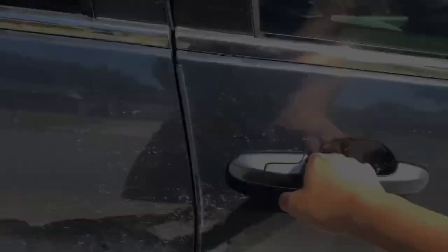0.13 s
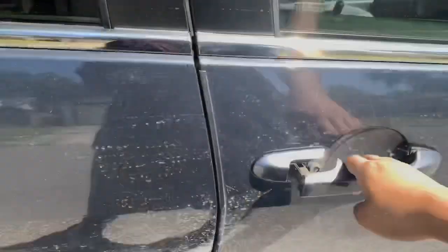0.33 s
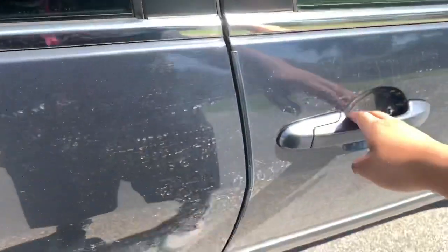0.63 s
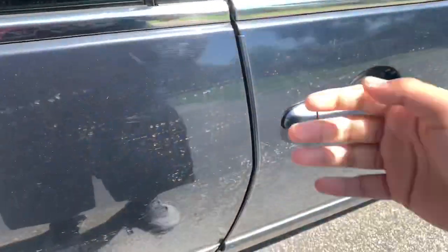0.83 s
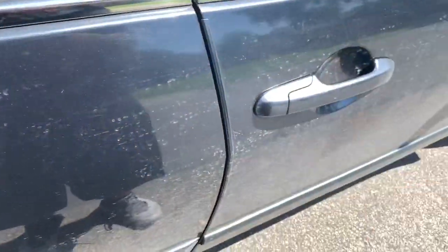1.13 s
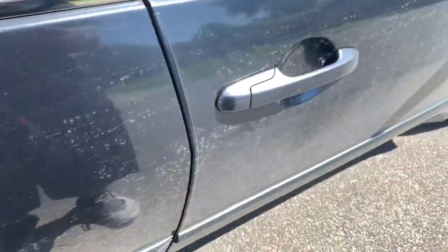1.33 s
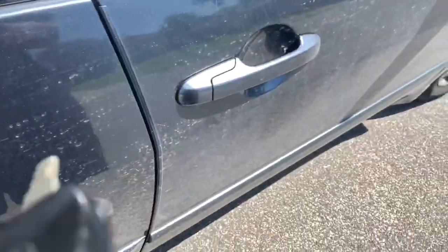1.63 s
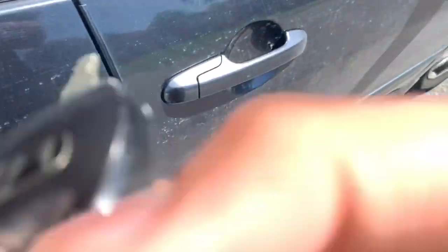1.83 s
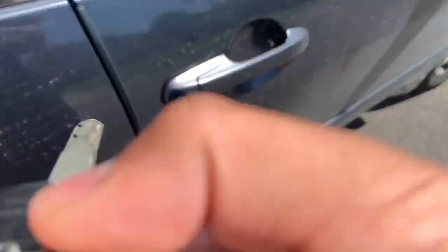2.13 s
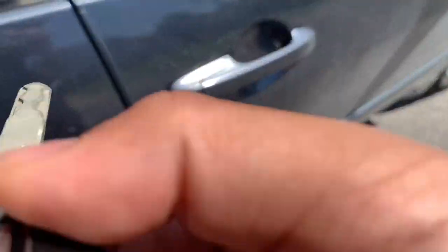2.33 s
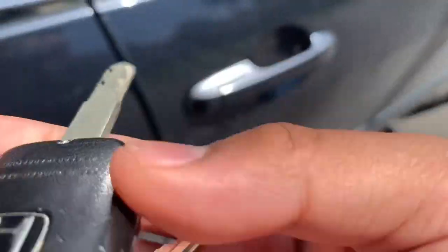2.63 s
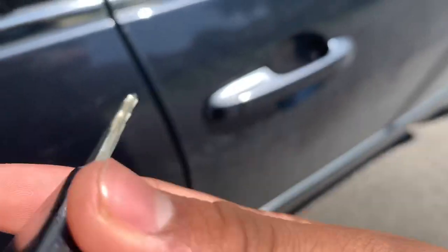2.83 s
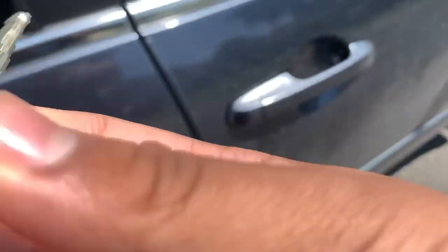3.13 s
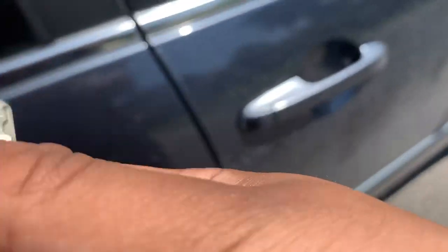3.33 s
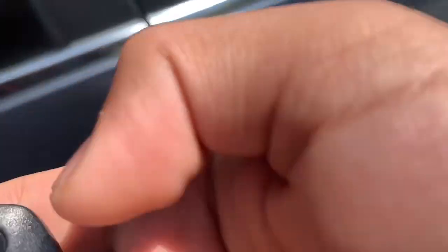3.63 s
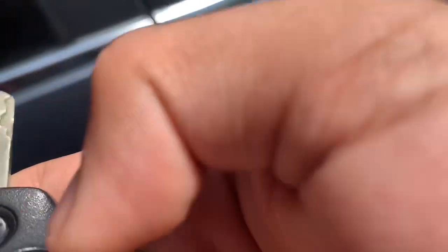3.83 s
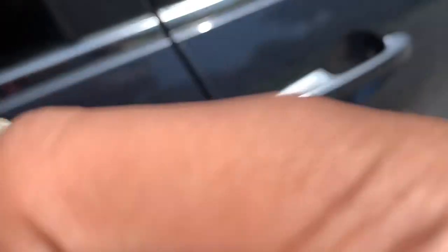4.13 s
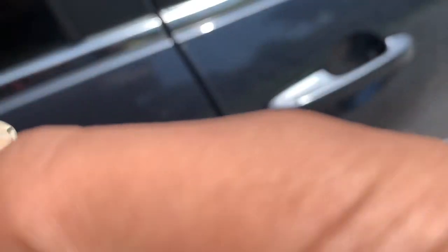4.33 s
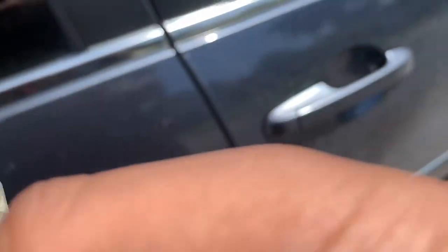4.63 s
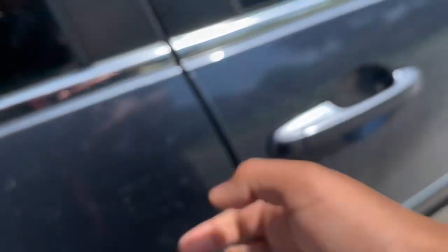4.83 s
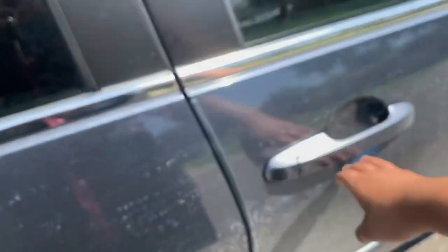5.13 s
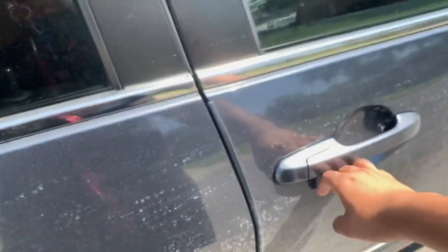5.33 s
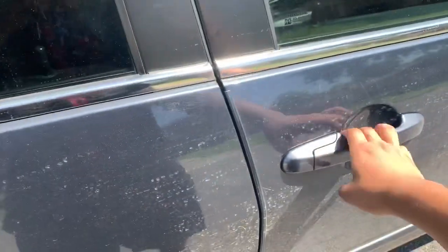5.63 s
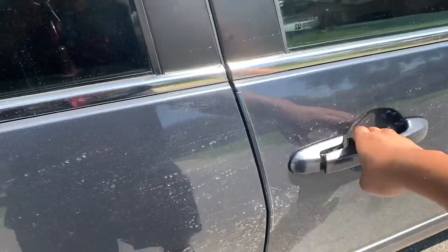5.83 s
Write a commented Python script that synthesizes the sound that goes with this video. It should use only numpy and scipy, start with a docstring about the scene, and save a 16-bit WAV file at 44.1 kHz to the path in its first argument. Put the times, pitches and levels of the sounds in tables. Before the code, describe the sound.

Close, handheld stereo outdoors beside a car. A door handle is pulled and let go with sharp clacks and hollow panel thumps in the first second. A key fob is then turned in the hand, with plastic ticks, brief metal ringing and skin rustle, in uneven clusters. Finally the hand returns to the handle with softer panel thuds. Faint traffic, insect hiss and low wind rumble lie behind.

```python
"""Outdoors beside a car: a door handle is pulled and let go, thumping the panel; then a key fob is turned
over in a hand, its plastic ticking and its metal key ringing, and the hand returns to the handle.
Contacts are noise bursts through resonances; panel and key are sums of dying partials; skin is shaped noise.
Behind: far traffic, insects hissing near 10 kHz and wind, as shaped noise; stereo from two spaced ports."""
import sys
import numpy as np
from scipy import signal
from scipy.fft import rfft, irfft, next_fast_len
from scipy.io import wavfile
from scipy.ndimage import uniform_filter1d

SR = 44100
rng = np.random.default_rng(int(sys.argv[2]) if len(sys.argv) > 2 else 0)


def to_wav(s):
    """Save 16-bit WAV."""
    ch = np.atleast_2d(s).T  # columns
    pcm = np.round(np.clip(ch, -1, 1) * 32767)  # PCM
    wavfile.write(sys.argv[1], SR, pcm.astype(np.int16))


N = 264497

# resonances of the fob's hollow shell: f/Hz, width/Hz, level/dB
SHELL_HOLLOW = [(164.7, 60, 13), (335, 160, 3), (435.5, 282, 10.5), (743, 83, 3), (890, 315, 0.5)]
LEFT_LAG_SAMPLES = 11.4


def gain_of(db):
    """Decibels to gain."""
    return 10 ** (np.asarray(db) / 20)


def read(points, hz):
    """Value of a spectrum table on a log-frequency axis."""
    f, value = np.transpose(points)
    return np.interp(np.log(hz + 1), np.log(f + 1), value)


def peaked(x):
    """Scales to peak 1."""
    return x / (abs(x).max() + 1e-12)


def add(mix, start_s, sound):
    """Mixes a sound in at start_s, cut at the end of the mix."""
    part = mix[round(start_s * SR):][:len(sound)]
    part += sound[:len(part)]


def coloured(x, points):
    """Filters by a spectrum table, with zero phase."""
    size = next_fast_len(len(x) + 1024)  # padded against wrap-around
    gain = gain_of(read(points, np.fft.rfftfreq(size, 1 / SR)))
    return irfft(rfft(x, size) * gain, size)[:len(x)]


def resonate(x, hz, width_hz):
    """A fixed resonance of gain 1: shift hz to zero, one-pole low-pass, shift back."""
    turn = np.exp(2j * np.pi * hz * np.arange(len(x)) / SR)
    pole = np.exp(-np.pi * width_hz / SR)
    return 2 * (turn * signal.lfilter([1 - pole], [1, -pole], x / turn)).real


def resonate_twice(x, hz, width_hz):
    """Two equal resonances in series: steeper skirts."""
    return resonate(resonate(x, hz, width_hz), hz, width_hz)


def through_hollow(x):
    """The parallel resonances of the fob's hollow."""
    return sum(gain_of(db) * resonate_twice(x, hz, width_hz) for hz, width_hz, db in SHELL_HOLLOW)


def ringing(modes, db, t):
    """Sum of dying partials with random phases."""
    hz, _, t60_s = np.transpose(modes)[..., None]
    decay = gain_of(db[:, None] - 60 * t / t60_s)
    return (decay * np.sin(2 * np.pi * (hz * t + rng.random(hz.shape)))).sum(0)


def burst(t, rise_s, t60_s):
    """Noise under a rounded rise and an exponential fall."""
    return rng.standard_normal(len(t)) * (1 - np.exp(-(t / rise_s) ** 2)) * gain_of(-60 * t / t60_s)


def curve(rows, index):
    """One dB column of a curve table at every sample, as gain."""
    rows = np.array(rows)
    return gain_of(np.interp(np.arange(N) / SR, rows[:, 0], rows[:, index]))


def noise(points, patchy_db):
    """Two unrelated noises of the given spectrum under shared drifting patches, as short-time spectra."""
    frames, hz = N // 128 + 5, np.fft.rfftfreq(512, 1 / SR)
    a, b, c, d, patches = rng.standard_normal((frames, 257, 5)).T
    patches = uniform_filter1d(uniform_filter1d(patches, size=6, axis=0), size=24, axis=1)
    level = gain_of(read(points, hz)[:, None] + patchy_db * patches / patches.std())
    return hz[:, None], np.array([a + 1j * b, c + 1j * d]) * level


def to_sound(z):
    """Inverse short-time transform, scaled so that levels are per root Hz."""
    return signal.istft(z, nperseg=512, noverlap=384)[1][..., :N] * np.sqrt(SR / 512) * 2


def air():
    """Far traffic: patchy noise, most alike at the ports in the bass and near 8 kHz."""
    # spectrum: f/Hz, level/dB per root Hz
    air_spectrum = [(20, -109), (60, -78), (150, -83.5), (400, -95), (1000, -100), (2000, -119),
                    (3200, -124), (4700, -112), (6000, -120), (8000, -118), (11000, -135), (17000, -145)]
    # likeness of the ports: f/Hz, share of common noise (0 to 1)
    likeness = [(60, 0.88), (300, 1), (700, 0.17), (2000, 0.11), (5000, 0.19), (8000, 0.93)]
    hz, (a, b) = noise(air_spectrum, patchy_db=0.5)
    same = np.clip(read(likeness, hz), 0, 1)
    late = np.exp(-2j * np.pi * hz * LEFT_LAG_SAMPLES / SR)
    left = late * (same * a + np.sqrt(1 - same ** 2) * b)
    return to_sound(np.array([left, a]))


def wind():
    """Rumble of wind and of the moving hand: lumpy low noise, mostly shared by the ports."""
    # t/s, level/dB
    rumble_level = [(0.0, -43.5), (.28, -48), (.38, -38), (.68, -52), (1.4, -57), (2.04, -70.5),
                    (2.39, -41.5), (2.56, -63.5), (3.2, -69), (3.42, -50), (3.66, -53), (3.89, -75),
                    (4.17, -56.5), (4.4, -74), (4.63, -46.5), (5.3, -67), (5.46, -37), (5.68, -57.5),
                    (6.0, -53)]
    band = signal.butter(3, [29, 95], "band", fs=SR, output="sos")
    low = signal.sosfilt(band, rng.standard_normal((2, N)))
    low = np.array([low[0] + .3 * low[1], low[0] - .3 * low[1]])
    return curve(rumble_level, index=1) * low / low.std()


def insects():
    """A narrow hiss whose level drifts in patches."""
    # f/Hz, level/dB per root Hz
    hiss_spectrum = [(7800, -125), (8600, -103), (9300, -102.5), (10000, -98), (10500, -99), (10900, -128)]
    return to_sound(noise(hiss_spectrum, patchy_db=-4.5)[1][0])


def bumps():
    """The microphones bumped in the hand: slow dying swings, alike at both ports."""
    # t/s, peak/dB, f/Hz, t60/s
    swings = [(2.335, -30, 44.6, 0.25), (0.32, -50, 40, .2)]
    out, t = np.zeros(N), np.arange(12000) / SR
    for s, peak_db, hz, t60_s in swings:
        swing = -np.sin(2 * np.pi * hz * t) * (1 - np.exp(-t / 0.0062)) * gain_of(-60 * t / t60_s)
        add(out, s, gain_of(peak_db) * peaked(swing))
    return out


def strokes():
    """Soft strokes of skin on the fob: dull noise that swells and fades."""
    # centre t/s, rms level before the swell/dB, length/s
    skin_strokes = [(0.204, -62, 0.1), (0.736, -51, 0.067), (1.825, -64, 0.1), (2.18, -52, 0.083),
                    (2.263, -51.5, 0.11), (2.61, -57.5, 0.17), (2.867, -56.5, 0.065), (2.996, -55, 0.087),
                    (3.146, -59.5, 0.16), (3.271, -54, 0.083), (4.093, -61.5, 0.098), (5.001, -65.5, 0.11),
                    (5.228, -56, 0.094), (5.872, -64, 0.085)]
    # f/Hz, level/dB
    stroke_tone = [(200, -11), (450, 8.5), (900, 1.5), (1600, -10), (2600, -17.5), (4000, -34)]
    out = np.zeros(N)
    for s, db, length_s in skin_strokes:
        swish = coloured(rng.standard_normal(12000), stroke_tone)[:round(length_s * SR)]
        add(out, s - length_s / 2, gain_of(db) * swish / swish.std() * np.hanning(len(swish)))
    return out


def rubbing():
    """Skin and plastic: dense tiny slips of uneven size make a grainy hiss, with a low rustle under it."""
    # t/s, hiss level/dB, rustle level/dB
    rub_levels = [(0.0, -68.5, -56), (.25, -64.5, -62), (.6, -70, -55), (.8, -90, -65.5), (1.0, -64, -60),
                  (1.15, -71, -63), (1.35, -65, -63), (1.5, -57.5, -55), (1.7, -66.5, -68),
                  (2.2, -68.5, -54), (2.42, -79.5, -63), (3.3, -70.5, -67), (3.5, -55.5, -59),
                  (3.72, -71.5, -59), (4.14, -71, -62), (4.3, -78.5, -61.5), (4.6, -103.5, -67),
                  (4.76, -61.5, -56.5), (5.05, -55, -50), (5.3, -69.5, -57.5), (6.0, -78.5, -61.5)]
    # f/Hz, level/dB
    rub_tone = [(1000, 6), (2000, 9), (3500, 3.5), (4800, 12.5), (6000, 3), (8000, 3.5), (11000, -6),
                (13000, -16), (15500, -31), (16500, -36)]
    slips_per_s = 1500
    size = gain_of(3.0 * np.minimum(rng.exponential(1, N), 5)) * (rng.random(N) < slips_per_s / SR)
    grain = burst(np.arange(400) / SR, 0.00017, 0.009)
    slips = signal.oaconvolve(size * rng.standard_normal(N), grain)[:N]
    hiss = coloured(slips + rng.standard_normal(N), rub_tone)
    rustle = through_hollow(rng.standard_normal(N))
    return curve(rub_levels, index=1) * hiss / hiss.std() + curve(rub_levels, index=2) * rustle / rustle.std()


def chatter(t, t60_s):
    """Loose parts bouncing at random, dying away; peak 1."""
    # f/Hz, level/dB
    rattle_tone = [(800, -18), (1800, 3), (3400, 0.5), (5000, -2.5), (6200, 11), (8200, -1.5),
                   (11500, -2.5), (14000, 10.5), (15800, -23.5), (17000, -52)]
    bounces_per_s = 800
    bounces = rng.exponential(1, len(t)) ** 2 * (rng.random(len(t)) < bounces_per_s / SR)
    bounces = uniform_filter1d(bounces, size=50)
    return peaked(coloured(burst(t, 0.0069, t60_s) * (peaked(bounces) + 0.043), rattle_tone))


def rattles():
    """Further bursts of chatter, short and long, as loose parts rattle."""
    # t/s, peak/dB, t60/s
    rattle_bursts = [(0.098, -50, .1), (0.332, -28.5, 0.066), (0.497, -30, 0.17), (.536, -37, 0.19),
                     (.946, -33, 0.064), (1.341, -25, 0.036), (1.371, -23, 0.17), (1.409, -27, 0.11),
                     (1.547, -38, 0.13), (1.576, -31, 0.061), (2.713, -49, 0.09), (3.122, -39, 0.085),
                     (3.36, -22.5, 0.36), (3.406, -18, 0.24), (3.458, -24, 0.086), (4.572, -38, 0.18),
                     (4.85, -32, 0.048), (4.902, -12.5, 0.11), (4.927, -23.5, 0.064), (5.027, -23.5, 0.22),
                     (5.092, -24, 0.035)]
    out, t = np.zeros(N), np.arange(8000) / SR
    for s, peak_db, t60_s in rattle_bursts:
        add(out, s, gain_of(peak_db) * chatter(t, t60_s))
    return out


def key():
    """The struck metal key rings on, each blow landing elsewhere, each ring wavering randomly in level."""
    # modes: f/Hz, level/dB, t60/s
    key_modes = [(8120, -8, .07), (8725, -15, .09), (9957, 0, .05), (11160, -16, .04), (11940, -20, .05),
                 (12720, -20, .05), (13480, -18, .08), (14262, -5, .17), (15690, -18, .08)]
    # t/s, level/dB added to the modes
    key_blows = [(1.3419, -30), (1.359, -23), (1.3729, -16), (1.4095, -36), (1.724, -41), (1.9765, -53),
                 (2.7389, -33), (3.361, -38), (3.4067, -19), (3.4265, -17), (3.477, -31), (3.5106, -51),
                 (3.57, -52), (3.666, -43), (4.9012, -23), (5.035, -49), (5.0911, -47)]
    out, t = np.zeros(N), np.arange(16000) / SR
    for s, level_db in key_blows:
        struck_db = np.array(key_modes)[:, 1] + 3. * rng.standard_normal(len(key_modes))
        waver = gain_of(5. * peaked(uniform_filter1d(rng.standard_normal(len(t)), size=500)))
        ring = ringing(key_modes, struck_db, t) * (1 - np.exp(-t / 0.0027))
        add(out, s, gain_of(level_db) * ring * waver)
    return out


def knocks():
    """The fob's shell knocking in the palm: rough bursts through its hollow."""
    # t/s, peak/dB, length/s (a third of the burst's t60)
    palm_knocks = [(1.334, -37.5, 0.03), (1.365, -34, 0.025), (1.426, -42, 0.038), (2.134, -34.5, 0.011),
                   (2.737, -50, 0.024), (2.769, -42.5, 0.068), (3.35, -24.5, 0.037), (3.386, -30, 0.041),
                   (3.445, -40, 0.016), (4.148, -36, 0.021), (4.533, -25.5, 0.055), (4.558, -25.5, 0.12),
                   (4.609, -23.5, 0.036), (4.924, -33.5, 0.045)]
    out, t = np.zeros(N), np.arange(8000) / SR
    for s, peak_db, length_s in palm_knocks:
        push = burst(t, 0.0014, 3 * length_s)
        add(out, s, gain_of(peak_db) * peaked(through_hollow(push)))
    return out


def ticks():
    """Hard contacts of handle and fob: a bright crack, a short shell ring, a low tap, loose parts chattering."""
    # t/s, treble peak/dB, treble f/Hz, shell f/Hz, shell peak/dB, body peak/dB, crack t60/s
    contacts = [(0.0964, -27, 7940, 4900, -58, -67, 0.01), (0.118, -28.5, 14400, 1700, -63, -67, 0.017),
                (.1412, -39, 10600, 5260, -59, -66, 0.03), (.3321, -34.5, 8040, 2850, -35, -47, .025),
                (.3434, -50, 8200, 1730, -35, -21.5, 0.021), (0.364, -25, 11300, 1890, -25, -35, 0.03),
                (.373, -9.5, 10500, 2400, -12, -7.5, 0.013), (0.3897, -41, 7980, 1750, -47, -19.5, 0.034),
                (.478, -42, 7430, 1700, -64, -39, .022), (0.495, -11, 14900, 5400, -56, -58, 0.021),
                (0.503, -15, 14700, 2530, -56, -34.5, 0.013), (0.5117, -26, 11800, 2190, -55, -37, 0.034),
                (0.5358, -10.5, 14900, 2390, -27.5, -36, 0.025),
                (0.7002, -43.5, 12400, 3380, -49, -44.5, 0.075),
                (0.7438, -41, 11800, 2200, -39, -41, 0.081), (0.7536, -17.5, 7950, 2570, -23, -19, 0.037),
                (0.7832, -41, 7930, 2230, -40, -27.5, 0.039),
                (0.9458, -30.5, 11700, 2400, -31.5, -33.5, 0.054),
                (0.9588, -46, 11100, 2570, -34.5, -39.5, 0.074), (.9724, -44, 8860, 2430, -34, -46, 0.057),
                (1.337, -25, 11400, 3400, -37, -25, 0.027), (1.3418, -12, 7770, 3410, -11, -26, 0.0049),
                (1.361, -15, 8460, 3380, -23, -33, 0.052), (1.3711, -7.5, 10500, 3430, -23, -26, 0.024),
                (1.3889, -19, 14000, 3420, -25, -27, 0.023), (1.409, -25, 14100, 3470, -33, -46, 0.027),
                (1.4279, -25, 7800, 4600, -30, -28.5, 0.059), (1.493, -27, 7550, 4830, -27.5, -34.5, 0.02),
                (1.5307, -42, 7520, 2610, -51, -37, 0.019), (1.5451, -33, 7150, 3300, -29.5, -32.5, 0.025),
                (1.5741, -40, 7390, 1860, -29, -33.5, 0.047), (1.5884, -35, 8620, 2020, -35, -38, 0.029),
                (1.6133, -40, 7480, 4220, -55, -39, 0.016), (1.6852, -45, 8620, 3330, -40, -40, 0.018),
                (1.7216, -27, 8300, 3840, -47, -32, 0.012), (1.7307, -48, 8040, 1940, -34.5, -37, 0.048),
                (1.749, -41, 8650, 1990, -34.5, -36, 0.034), (1.8573, -44, 10500, 2190, -40.5, -40, 0.017),
                (1.8726, -34.5, 7850, 2160, -38, -35, 0.012), (1.9555, -59, 8200, 3100, -39.5, -43, 0.014),
                (1.9759, -24.5, 8000, 2600, -35, -37.5, 0.018), (2.002, -41, 8100, 2340, -39, -40, 0.038),
                (2.0776, -34, 8060, 3320, -39, -37, 0.012), (2.1215, -39, 8480, 4820, -44, -40, 0.021),
                (2.1374, -20, 7950, 3280, -38, -31.5, 0.011), (2.216, -45, 7330, 4430, -48, -53, .012),
                (2.699, -41, 8310, 2200, -53, -42.5, .025), (2.7149, -42, 14300, 4220, -48, -41, 0.067),
                (2.739, -15.5, 13800, 2860, -55, -32, 0.011), (2.751, -43, 8300, 2120, -59, -32, 0.021),
                (2.776, -53, 8890, 2150, -43.5, -32, 0.027), (2.8171, -27.5, 14300, 2160, -37, -32.5, .017),
                (2.962, -47.5, 8750, 1890, -48, -42, 0.015), (2.9833, -40.5, 8790, 3570, -41.5, -40, 0.023),
                (3.1219, -28.5, 8380, 2200, -40, -36.5, 0.022),
                (3.2393, -36.5, 8600, 3730, -43, -42.5, 0.041), (3.3338, -54, 8740, 1860, -48, -48, 0.042),
                (3.3506, -25.5, 8800, 4650, -30, -43, 0.029),
                (3.361, -20.5, 9500, 4520, -31.5, -27.5, 0.017),
                (3.4056, -1.5, 14500, 3860, -15.5, -26.5, 0.0076),
                (3.4111, -8, 11700, 2060, -20.5, -27, 0.0057), (3.4261, -18, 8450, 3600, -24, -32.5, 0.018),
                (3.458, -24, 14300, 2410, -35, -36, 0.016), (3.4771, -41, 14200, 1970, -33, -45, 0.083),
                (3.5115, -20.5, 10800, 4320, -28, -39, .011), (3.5438, -39, 7620, 2540, -40, -47.5, 0.03),
                (3.57, -35.5, 8510, 2440, -36.5, -50, 0.011),
                (3.5916, -40.5, 8740, 3850, -37.5, -48, 0.056),
                (3.6339, -10, 10400, 3360, -22.5, -41, 0.0096),
                (3.667, -19, 10200, 3320, -25.5, -47, 0.021),
                (3.7386, -16.5, 11000, 4640, -35, -29.5, 0.014),
                (3.785, -63, 10100, 2020, -45.5, -46, 0.03), (4.128, -36.5, 12400, 2430, -43.5, -55, 0.063),
                (4.157, -20, 11000, 2480, -31.5, -29.5, 0.0061),
                (4.1705, -27, 7300, 2500, -27.5, -47, 0.014),
                (4.2199, -20, 11700, 2210, -18.5, -40, 0.0089),
                (4.2953, -32, 11300, 4780, -39.5, -39, .013),
                (4.5473, -34.5, 8150, 1840, -49, -25.5, 0.044), (4.571, -16, 10400, 2430, -15.5, -35, 0.02),
                (4.605, -31, 11100, 1700, -32, -27.5, 0.058),
                (4.6893, -27.5, 7800, 2420, -38, -33.5, 0.0074), (4.752, -39, 8500, 2380, -45, -62, 0.0075),
                (4.7755, -58, 7800, 2500, -47, -50, 0.0058), (4.7884, -56, 8710, 2080, -31, -57, 0.011),
                (4.804, -45, 7180, 2280, -39.5, -65, 0.041), (4.8495, -38, 10800, 3690, -44, -43, 0.044),
                (4.8656, -40, 7300, 2120, -35, -46, .013), (4.874, -47, 7220, 3460, -33, -49, 0.054),
                (4.8914, -29, 7840, 2113, -36, -34.5, 0.06), (4.9012, -6.5, 14000, 3240, -12.5, -59, 0.014),
                (4.9251, -11, 9800, 3300, -15.5, -37, 0.045), (4.9528, -32, 7640, 3300, -20.5, -38, 0.017),
                (5.0265, -27.5, 6400, 3300, -24, -37.5, .033), (5.035, -31, 7720, 3320, -27.5, -60, 0.091),
                (5.053, -27, 9600, 3400, -34.5, -59, 0.054), (5.0913, -15.5, 15700, 3350, -22, -52, 0.039),
                (5.101, -36, 14300, 4480, -32, -54, 0.0069), (5.2038, -60, 8400, 3250, -46.5, -61, 0.019),
                (5.2371, -46, 8200, 3270, -47.5, -46, 0.039), (5.4173, -60, 8900, 3020, -50, -48, 0.016),
                (5.448, -46, 8300, 2230, -44.5, -56, 0.032), (5.7364, -50, 10400, 1740, -51.5, -50, .017),
                (5.8036, -68, 10000, 2750, -52, -64, 0.011), (5.9256, -42, 5520, 2500, -47, -70, 0.027),
                (5.9409, -52, 10300, 2350, -37.5, -24, 0.072)]
    # crack: f/Hz, level/dB
    crack_tone = [(4500, -34.5), (6000, -11.5), (8200, 12), (10500, 18), (12500, -11), (15500, -1),
                  (17000, 6.5)]
    # chatter re contact peak: more after long loose contacts, less in step with hard ones
    chatter_db, chatter_db_per_doubling, chatter_db_per_peak_db = -22, 5, -0.1
    chatter_t60_s, firm_t60_s = 0.08, .015
    out, taps, t = np.zeros(N), np.zeros(N), np.arange(6000) / SR
    for s, treble_db, treble_hz, shell_hz, shell_db, body_db, t60_s in contacts:
        snap = burst(t, 0.00043, t60_s)
        crack = peaked(coloured(snap, crack_tone) + 10.6 * resonate(snap, treble_hz, 2200))
        blow = burst(t, 0.0011, 0.35 * t60_s)
        shell = peaked(resonate_twice(blow, shell_hz, 670) + 0.5 * resonate_twice(blow, 2500, 2700))
        tap = peaked(resonate_twice(burst(t, 0.00045, 1.92 * t60_s), 540, 1100))
        peak_db = max(treble_db, shell_db)
        under_db = chatter_db + chatter_db_per_doubling * np.log2(t60_s / firm_t60_s)
        under_db += chatter_db_per_peak_db * peak_db
        loose = gain_of(peak_db + under_db) * chatter(t, chatter_t60_s)
        add(out, s, gain_of(treble_db) * crack + gain_of(shell_db) * shell + loose)
        add(taps, s, gain_of(body_db) * tap)
    return out, taps


def door():
    """Blows on the door panel: a short rough push sets clusters of close panel modes ringing."""
    # t/s, peak/dB, f of the mode under the blow/Hz, its lift/dB, dullness/dB per octave
    blows = [(.097, -30.5, 362, 4.5, 2), (.116, -32, 354, 5, .2), (.316, -27.5, 266, 23, 1),
             (0.341, -14, 264, 15, 0.5), (.372, -5, 340, 13.5, 0), (.404, -13.5, 181.5, 31.5, -1.5),
             (0.44, -26, 156, 20, 14), (0.732, -28, 253, 13, 6.5), (.757, -4.5, 242.4, 19.5, -2.2),
             (0.798, -27.5, 342, 13, 10), (.861, -31.5, 155.6, 17, 11.5), (5.298, -25, 439, 19.5, -1.7),
             (5.449, -20, 420, 9.5, 6), (5.733, -35.5, 264, -0.5, 5), (5.801, -33.5, 212, 18, 5.5),
             (5.926, -31, 290, 13, 4), (5.947, -20.5, 360, 19.5, .5), (5.965, -17.5, 176, -5, 6),
             (5.984, -12, 268, 22.5, 2)]
    # panel modes: f/Hz, level/dB, t60/s
    panel_modes = [(95.6, -14, 0.44), (154.9, -12.5, 0.54), (237, 3.5, 0.17), (321.3, 0, 0.18),
                   (427.4, -9.5, 0.3), (493.6, -12, 0.37), (597, -4.5, 0.067), (709.5, -13.5, 0.14),
                   (801, -12.5, 0.19), (872, -7.5, 0.057), (997, -8.5, 0.1), (1185, -31.5, 0.047),
                   (1232, -14.5, 0.062), (1395, -23, 0.088), (1656, -27.5, 0.12), (1780, -26, 0.031),
                   (2070, -25, 0.12)]
    # a softer push lasts longer; its rise constant far exceeds its length, so it starts nearly as t squared
    push_t60_s, push_s_per_db = .006, .00018
    push_rise_s, rise_s_per_db = 0.0015, 0.27
    out, t = np.zeros(N), np.arange(16000) / SR
    for s, peak_db, struck_hz, lift_db, dull_db in blows:
        crowd = np.repeat(panel_modes, repeats=6, axis=0)
        crowd[:, 0] *= 1 + 0.0725 * rng.standard_normal(len(crowd))
        mode_db = crowd[:, 1] - dull_db * np.log2(crowd[:, 0] / 230)
        panel = ringing(crowd, mode_db, t) * (1 - np.exp(-t / 0.0003))
        panel += gain_of(lift_db - 60 * t / 0.086) * np.sin(2 * np.pi * struck_hz * t)
        push = burst(t[:4000], push_rise_s - rise_s_per_db * peak_db, push_t60_s - push_s_per_db * peak_db)
        add(out, s, gain_of(peak_db) * peaked(signal.oaconvolve(panel, push)[:len(t)]))
    # the blows carry little deep bass
    return signal.sosfilt(signal.butter(2, 85, "high", fs=SR, output="sos"), out)


def ports(x):
    """Left port hears later, its middle band louder and shifted in phase."""
    # phase added to that of the lag: f/Hz, shift/rad
    left_shift = [(200, .15), (1000, .7), (2100, 1.5), (2900, 5.6), (4000, 7.3), (5400, 7.7), (6500, 6.28),
                  (17000, 6.28)]
    # extra level: f/Hz, lift/dB
    left_lift = [(300, 0), (700, 2), (1600, 3.5), (3500, 4), (5500, 1), (7000, 0), (17000, 0)]
    size = next_fast_len(N + 512)
    hz = np.fft.rfftfreq(size, 1 / SR)
    phase = read(left_shift, hz) - 2 * np.pi * hz * LEFT_LAG_SAMPLES / SR
    left = gain_of(read(left_lift, hz)) * np.exp(1j * phase)
    return np.array([irfft(rfft(x, size) * left, size)[:N], x])


def yard(x):
    """Short scattered echoes, unlike at each port: four random echo patterns crossfaded in turn."""
    # f/Hz, level/dB
    echo_tone = [(800, 0.5), (1600, -23), (3000, 4), (7000, -1.5), (10000, -0.5), (17000, -13.5)]
    pattern_rounds_per_s = 1.7
    t, near, out = np.arange(3000) / SR, coloured(x, echo_tone), np.zeros((2, N))
    for k in range(4):
        # squares of the shares sum to 1
        share = np.maximum(np.cos(np.pi / 2 * (pattern_rounds_per_s * 4 * np.arange(N) / SR - k)), 0)
        tail = rng.standard_normal((2, len(t))) * (t > .0005) * gain_of(-60 * t / .03)
        out += signal.oaconvolve((share * near)[None], tail / np.linalg.norm(tail[0]), axes=1)[:, :N]
    return out


def scene():
    """Near sources through the port pair, low knocks from nearly in front, plus echoes and background."""
    front_lag_samples = 3
    bright, taps = ticks()
    bright = bright + key() + rattles()
    front = door() + knocks() + taps
    echoes = gain_of(-8) * yard(bright + front)
    sided = ports(bright + rubbing() + strokes() + insects())
    frontal = np.array([np.roll(front, front_lag_samples), front])
    return sided + frontal + echoes + bumps() + wind() + air()


def record(dry):
    """A short fade-in and the band limit."""
    fade_in_s, edge_hz = .012, 16800
    faded = dry * np.minimum(np.arange(N) / SR / fade_in_s, 1)
    low_pass = signal.firwin(511, edge_hz, window=("kaiser", 9), fs=SR)
    return signal.oaconvolve(faded, low_pass[None], "same")


dry = scene()
out = record(dry)
to_wav(out)
```